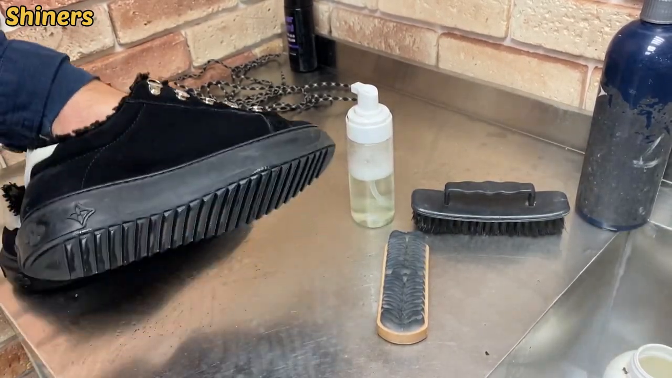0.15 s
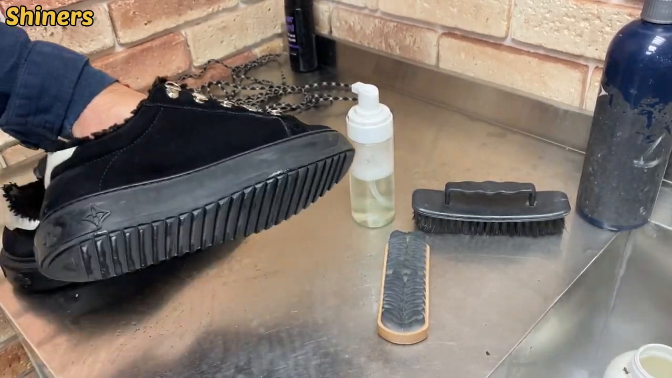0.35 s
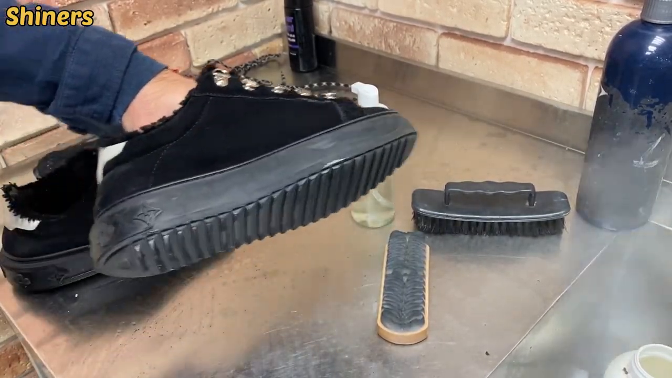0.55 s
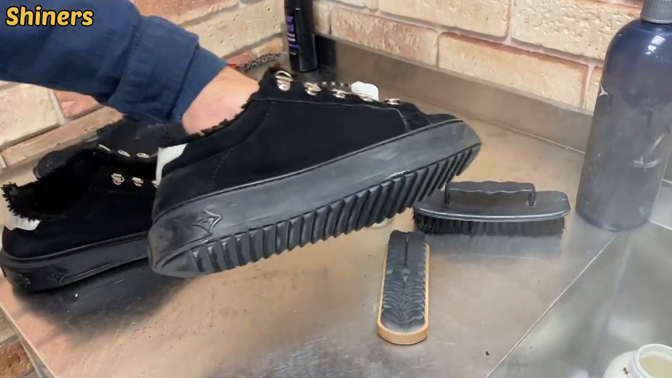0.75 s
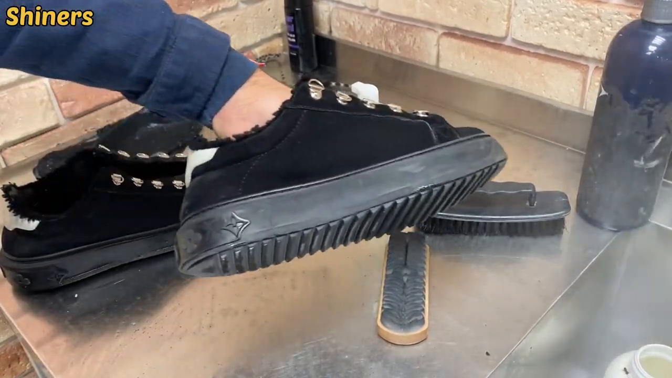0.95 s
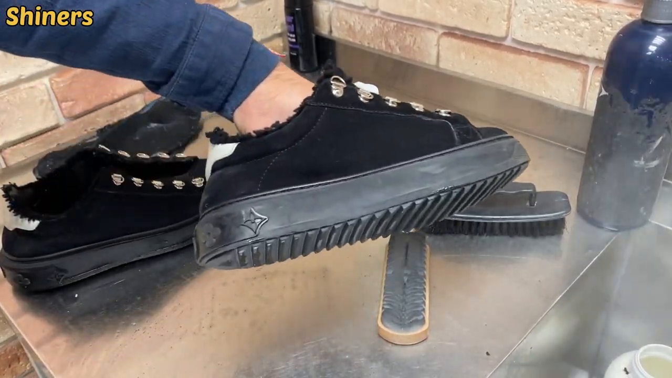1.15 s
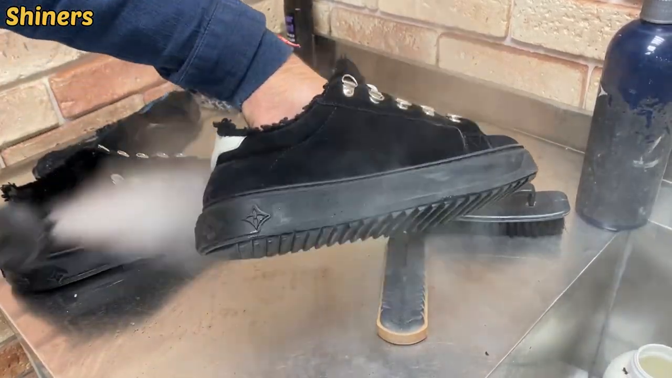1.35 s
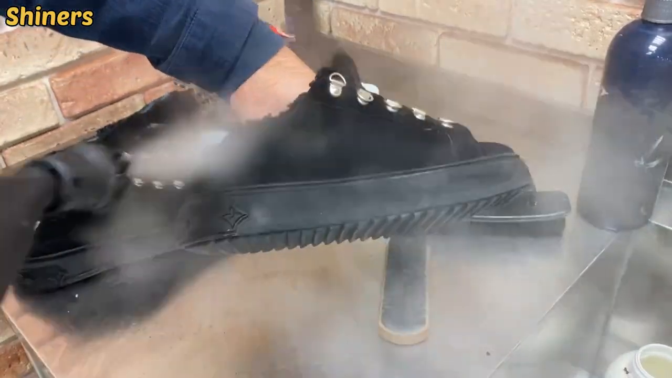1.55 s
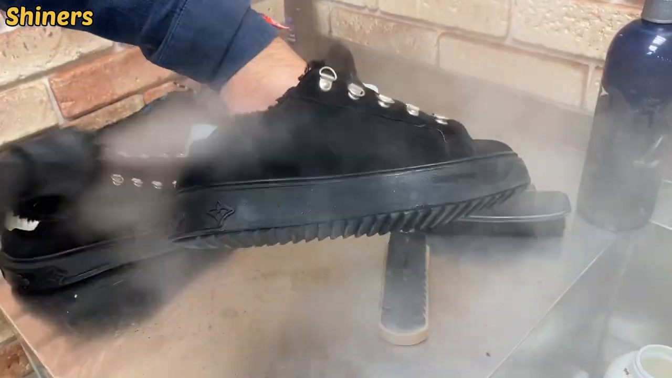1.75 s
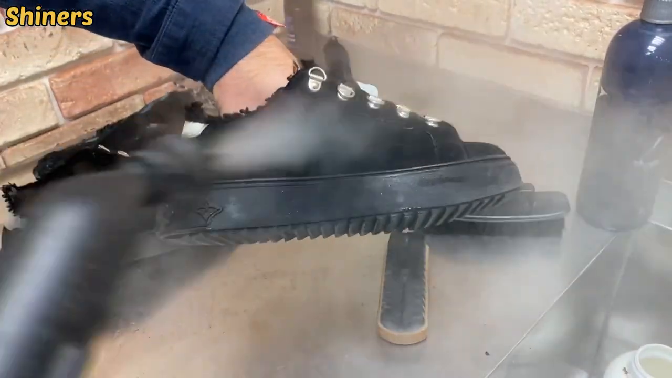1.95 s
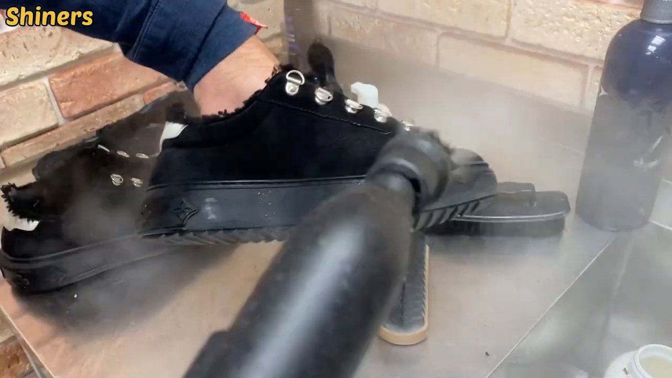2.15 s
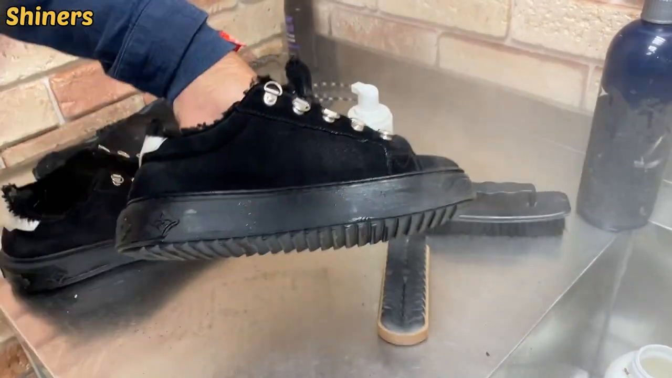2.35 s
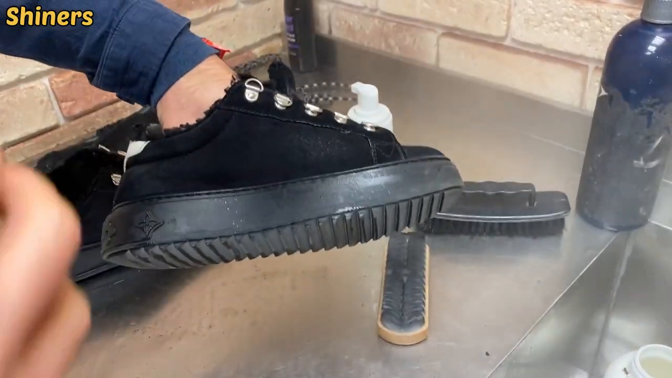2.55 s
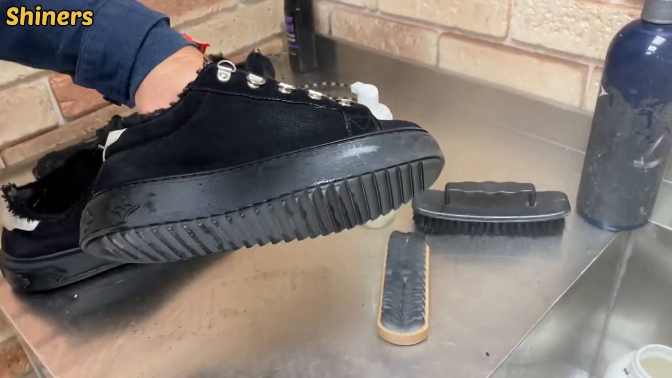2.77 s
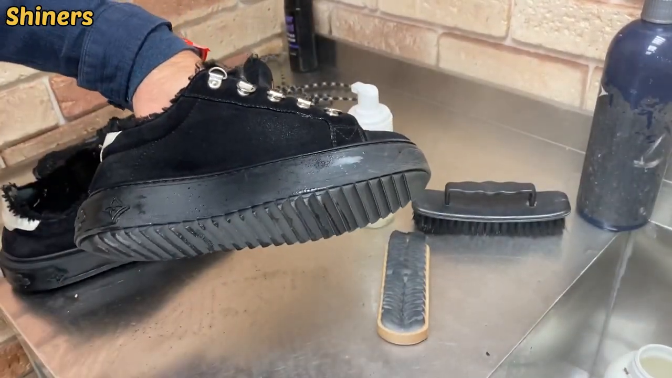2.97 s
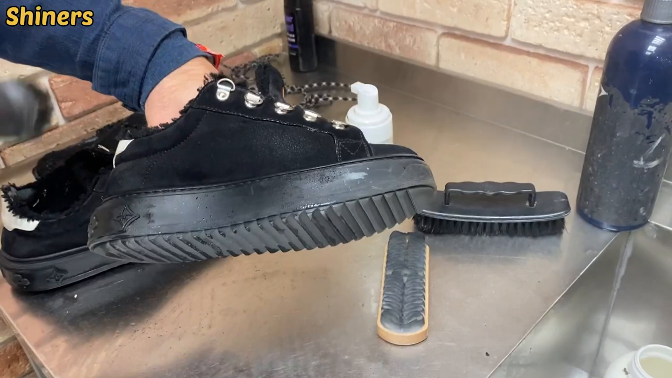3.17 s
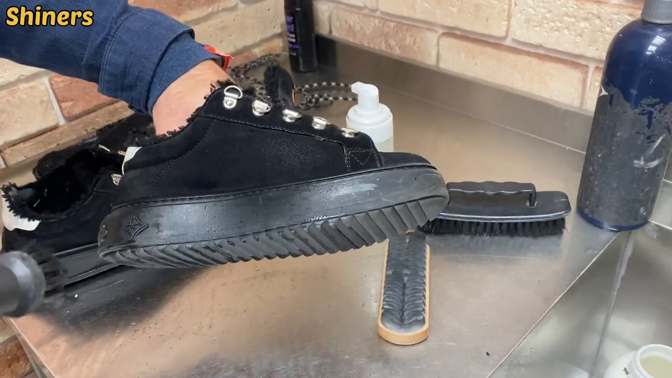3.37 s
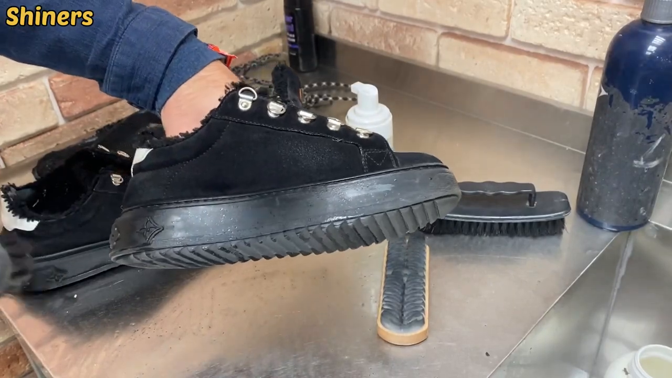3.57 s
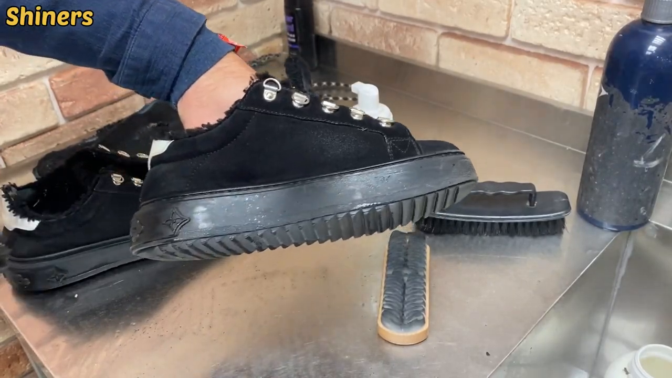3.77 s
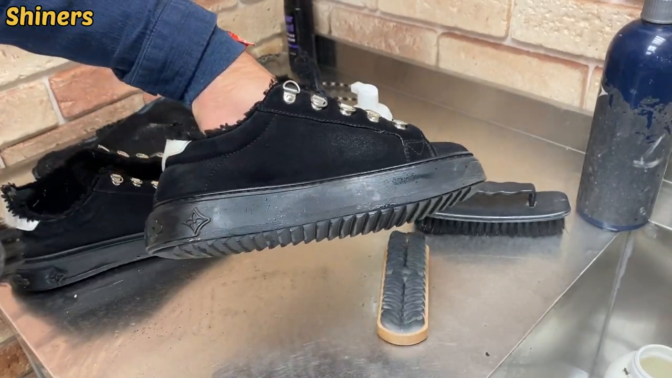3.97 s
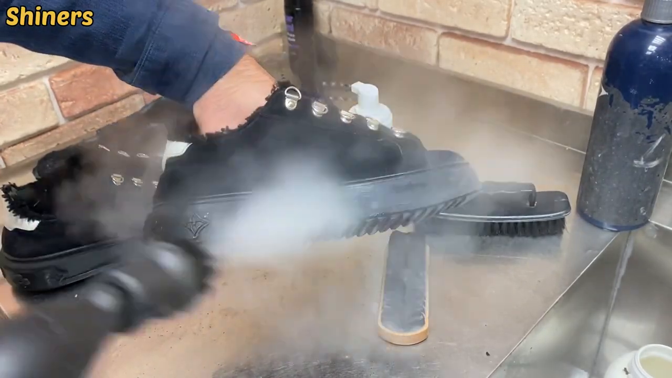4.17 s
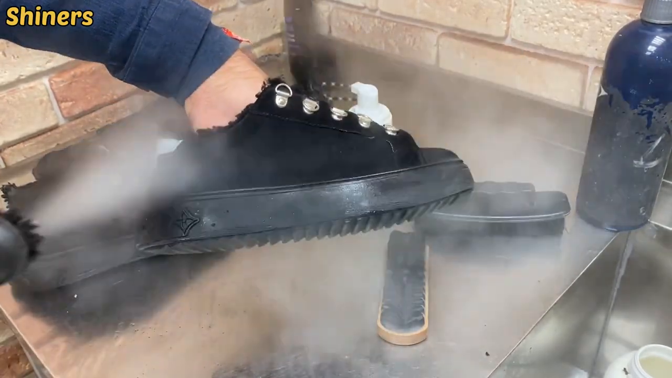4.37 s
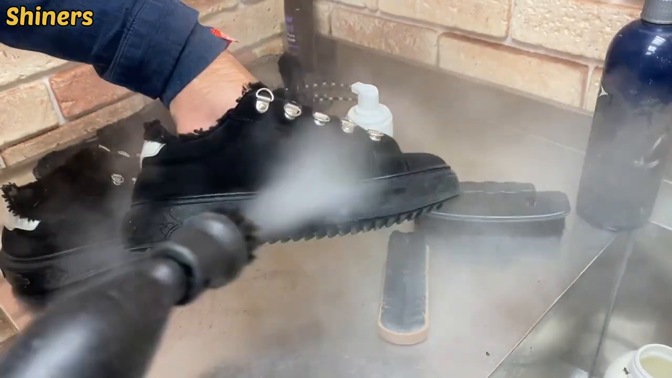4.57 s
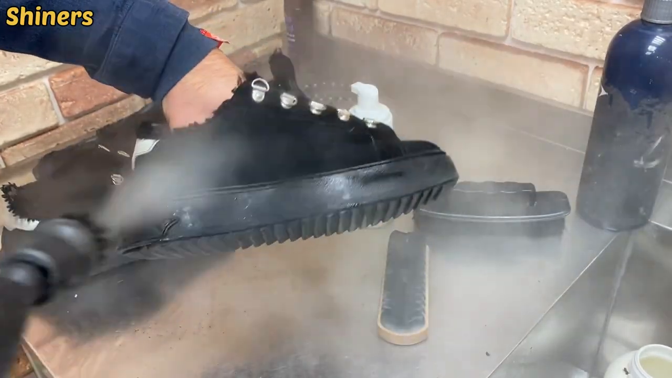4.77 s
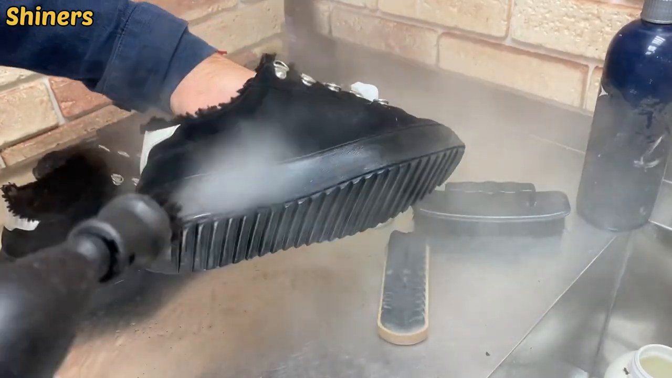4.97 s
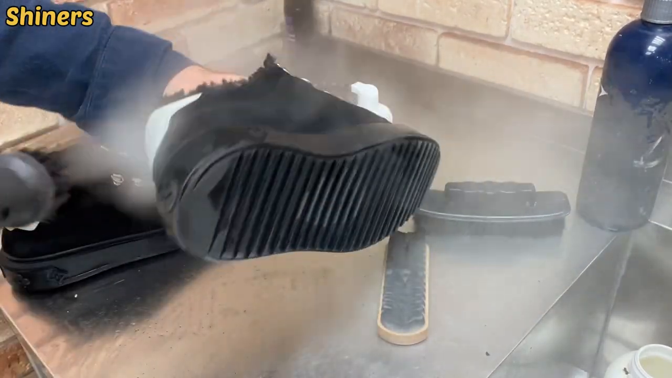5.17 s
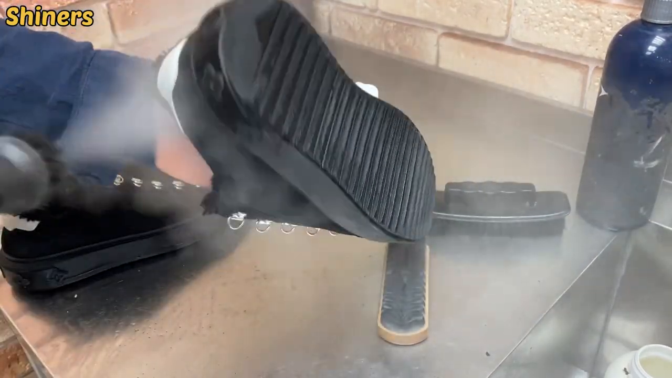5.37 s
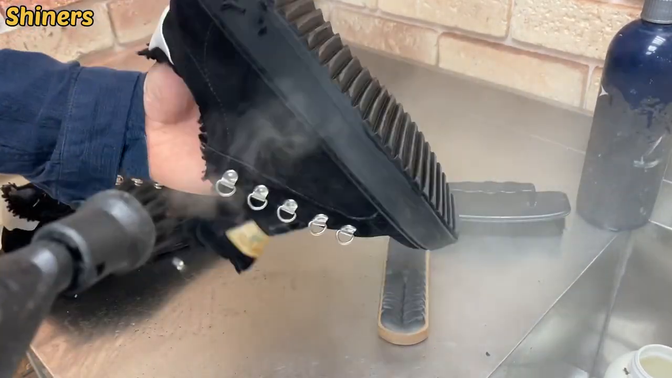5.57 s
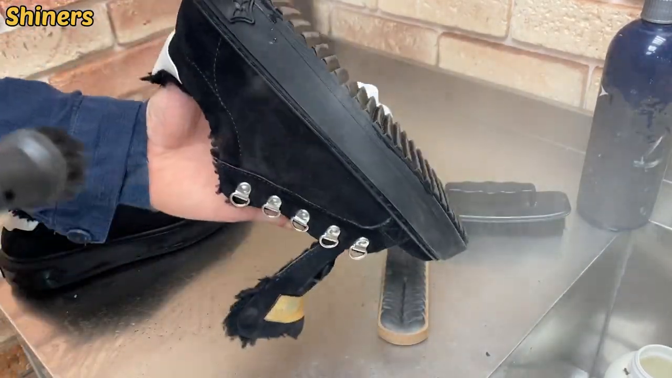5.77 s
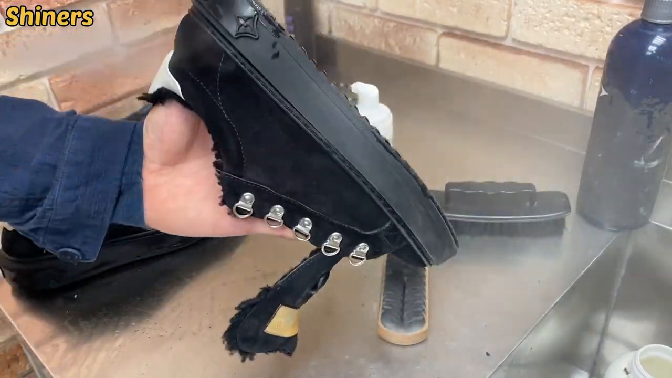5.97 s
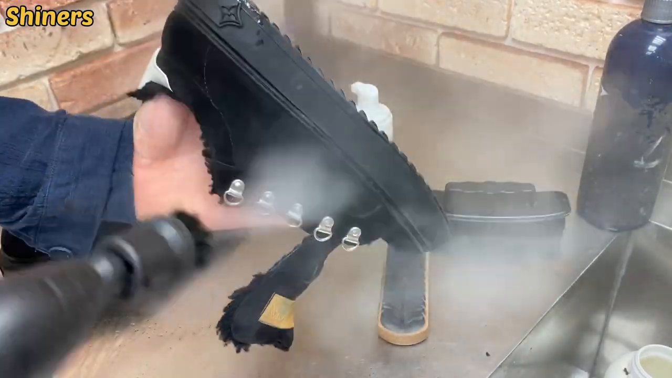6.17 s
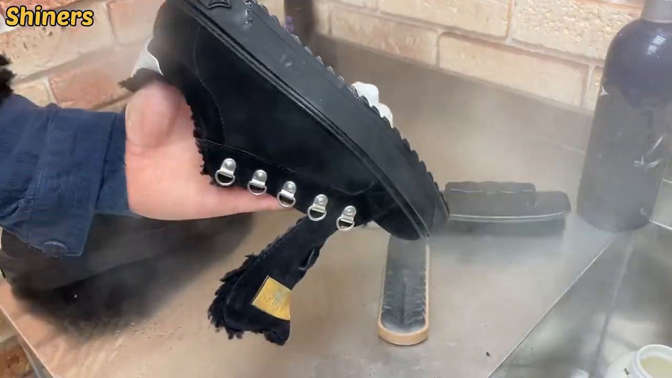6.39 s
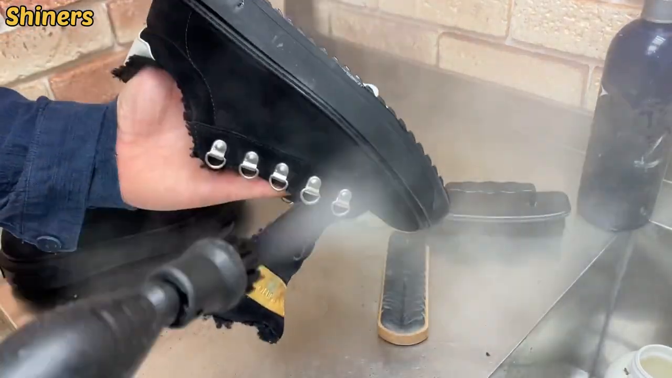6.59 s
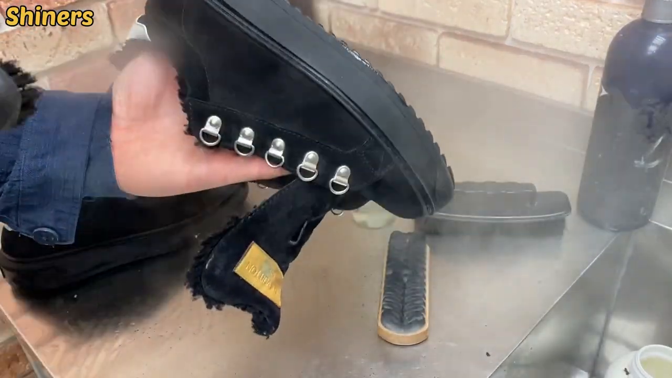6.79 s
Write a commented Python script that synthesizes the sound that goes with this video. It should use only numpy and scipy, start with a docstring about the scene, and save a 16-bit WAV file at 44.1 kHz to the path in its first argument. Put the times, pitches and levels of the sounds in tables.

```python
"""A low room hum, a steel counter's hum and a dying hiss come first, then two test puffs of a handheld steamer.
Three long, wet bursts on a suede shoe follow; between them wand and hose knock, drag and squeak.
Steam is filtered noise in three bands, with valve, pressure and surge gains, sputters and droplets.
Handling is noise in resonances, the counter decaying sines; a small brick room rings after each burst."""
import sys
import numpy as np
from scipy import signal
from scipy.fft import rfft, irfft
from scipy.io import wavfile
from scipy.ndimage import uniform_filter1d

SR = 44100
rng = np.random.default_rng(int(sys.argv[2]) if len(sys.argv) > 2 else 0)


def dump(signal):
    """Clip the signal to [-1, 1] and save it as 16-bit WAV at the path in sys.argv[1]."""
    limited = np.clip(np.atleast_2d(signal).T, -1, 1)
    pcm = np.round(limited * 32767).astype(np.int16)
    wavfile.write(sys.argv[1], SR, pcm)


N = 301203
TIME, FREQ = np.arange(N) / SR, np.fft.rfftfreq(N, 1 / SR)


def amp(db):
    """Decibels to gain."""
    return 10 ** (np.asarray(db) / 20)


def unit(x):
    """Scales to rms 1."""
    return x / np.sqrt(np.mean(x ** 2) + 1e-20)


def read(points, hz, axis=1):
    """One column of a table, interpolated over log frequency."""
    table = np.transpose(points)
    return np.interp(np.log(hz + 1), np.log(table[0] + 1), table[axis])


def colour(x, gain):
    """Filters by a gain over FREQ."""
    return irfft(rfft(x) * gain, N)


def noise(gain):
    """Two unrelated noises of that colour: row 0 the common sound, row 1 the diffuse one."""
    return unit(colour(rng.standard_normal((2, N)), gain))


def below(hz, order=4):
    """Low-pass gain."""
    return 1 / np.sqrt(1 + (FREQ / hz) ** (2 * order))


def thirds(low_hz, high_hz):
    """Treble, middle and bass gains whose powers sum to one."""
    low, high = below(low_hz), below(high_hz)
    treble = np.sqrt(1 - high ** 2)
    middle = high * np.sqrt(1 - low ** 2)
    return treble, middle, high * low


def peaks(modes):
    """Gain of a set of resonances, summed in power."""
    power = 0
    for hz, width_hz, db in modes:
        power = power + amp(db) ** 2 / (1 + (2 * (FREQ - hz) / width_hz) ** 2)
    return np.sqrt(power)


def wander(rate_hz):
    """Random drift of rms 1, up to about that rate."""
    return unit(colour(rng.standard_normal(N), below(rate_hz, order=2)))


def blow(start_s, rise_s, t60_s):
    """Envelope that swells at start_s and dies away."""
    age_s = np.maximum(TIME - start_s, 0)
    return (1 - np.exp(-age_s / rise_s)) * np.exp(-np.log(1000) * age_s / t60_s)


def gate(start_s, end_s, attack_s, release_s, snap=0.58):
    """Gain that ramps up, holds, then eases off and snaps shut."""
    opening = np.clip((TIME - start_s) / attack_s, 0, 1)
    closing = np.clip((end_s - TIME) / release_s, 0, 1) ** snap
    return opening * closing


# room's lowest resonances: pitch_hz, width_hz, level_db
HUM_MODES = [(71, 4.6, 2), (40, 40, -14.5), (130, 22, -7)]


def boom():
    """Noise in the room's lowest resonances, rms 1."""
    return noise(peaks(HUM_MODES) * below(hz=135, order=5))


# faint room noise spectrum: pitch_hz, density_db (per Hz)
FLOOR = [(20, -8), (100, 4), (300, -10.5), (700, -16.5), (1500, -27), (4000, -29), (7000, -35.5),
         (15000, -39)]
# steady hum level; gains by which puffs, bursts and hose stir it; linger time constant
HUM_DB, HUM_PUFF_DB, HUM_JET_DB, HUM_HOSE_DB, HUM_LINGER_S = -54, -27, -32.5, 1.5, 0.11


def background(puffs, bursts, dragging):
    """Low hum whose power swells with steam and hose and lingers, over faint room noise."""
    stir = 0
    for db, source in [(HUM_PUFF_DB, puffs), (HUM_JET_DB, bursts), (HUM_HOSE_DB, dragging)]:
        stir = stir + (amp(db) * source[0]) ** 2
    keep = np.exp(-1 / (HUM_LINGER_S * SR))
    stirred_power = signal.lfilter([1 - keep], [1, -keep], stir)
    level = np.sqrt(amp(HUM_DB) ** 2 + stirred_power)
    return level * boom() + amp(-64.5) * noise(amp(read(FLOOR, FREQ)))


# steam spectrum, aimed at the counter: pitch_hz, density_db (per Hz)
PUFF_SPECTRUM = [(40, -35.5), (110, -15), (250, 3), (480, -6.5), (720, -9.5), (900, -7.5), (1300, -8.5),
                 (2400, -9.5), (3400, -12), (5200, -10), (7200, -4), (9500, -5.5), (12000, -12.5),
                 (15500, -17.5)]


def dying_hiss():
    """The room still rings and booms with steam let off a moment before."""
    hiss = noise(amp(read(PUFF_SPECTRUM, FREQ)) * below(hz=9000, order=2))
    hiss = amp(-45.0) * blow(0, rise_s=0.0007, t60_s=0.71) * hiss
    return hiss + amp(-42) * blow(0, rise_s=.002, t60_s=1.8) * boom()


# hums of the steel counter: start_s, pitch_hz, level_db, t60_s
COUNTER = [(0.0, 217, -49, 0.77), (0.221, 211.5, -42, 2.0), (0.228, 122, -36.5, 1.3),
           (0.749, 128, -36.5, 1.7), (1.24, 124.8, -32, 1.2)]


def counter():
    """Low modes of the steel sheet: decaying sines, in the common sound only."""
    hum = np.zeros(N)
    for start_s, hz, db, t60_s in COUNTER:
        hum += amp(db) * blow(start_s, .01, t60_s) * np.sin(2 * np.pi * hz * (TIME - start_s))
    return hum * np.array([[1], [0]])


# slugs of wet steam that surge or choke the jet: centre_s, buffet_change_db, hiss_and_splash_change_db
SURGES = [(0.36, 4, 0), (0.765, 7, 2), (1.385, 2.5, 1.5), (1.445, 1.5, 4.5), (1.51, 3.5, 1.5),
          (1.57, 0.5, -2), (1.71, 4.5, 3), (1.811, -3, -2), (1.88, 1, 2), (1.95, 3, 2), (2.005, -6, -2),
          (2.08, 0, 1), (4.115, -10, -1.5), (4.143, 10, 0), (4.219, 8, 1), (4.39, 12, 1), (4.55, 9.5, 2.5),
          (4.651, 13, 2), (4.735, 8.5, 2), (4.8, -14.5, -1), (5.0, 8, 1.5), (5.13, 11.5, 0.5),
          (5.405, 12, 2), (5.98, -13.5, -1.5), (6.005, 6, 0.5), (6.199, 9, 1.5), (6.435, 11.5, 2),
          (6.57, 3.5, 1.5), (6.66, 8, 3), (6.82, 10.5, 0.5)]
SURGE_S = .022  # half length, to 1/e of the dB change


def surge(axis):
    """Summed dB change from the slugs: column 1 for buffeting, 2 for hiss and splash."""
    return sum(row[axis] * np.exp(-((TIME - row[0]) / SURGE_S) ** 2) for row in SURGES)


SAG_S = 0.6  # time constant of the boiler pressure sag


def flow(pulls, splash_power=0.42, buffet_power=.9, buffet_sag=1.25):
    """Gains of hiss, splash and buffeting: valve opens, pressure sags, slugs surge, valve shuts."""
    hiss, splash, buffet = np.zeros((3, N))
    for start_s, end_s, opening_s, closing_s, hiss_db, splash_db, buffet_db, sag_db in pulls:
        valve = gate(start_s, end_s, opening_s, closing_s)
        sag = 1 - np.exp(-np.maximum(TIME - start_s, 0) / SAG_S)
        pressure = amp(-sag_db * sag)
        hiss += amp(hiss_db) * valve * pressure
        splash += amp(splash_db) * valve ** splash_power * pressure
        buffet += amp(buffet_db) * valve ** buffet_power * pressure ** buffet_sag
    lift = amp(surge(axis=2))
    return hiss * lift, splash * lift, buffet * amp(surge(axis=1))


def reflect(x, echo_db, longest_s, sway_s, count=5):
    """Nearby surfaces echo the jet; their paths change as the hand moves."""
    out = x.copy()
    for k in range(count):
        path_s = longest_s * (k + rng.uniform(.3, 1)) / count
        sway = np.sin(2 * np.pi * (rng.uniform(.2, .6) * TIME + rng.random()))
        delay_s = path_s + sway_s * sway
        at = np.clip(np.round((TIME - delay_s) * SR).astype(int), 0, N - 1)
        out += amp(echo_db) * x[:, at]
    return unit(out)


def gurgle(x, patchy_db, size=512):
    """Wet steam is uneven: patches a few hundred hertz wide swell and fade."""
    z = signal.stft(x, nperseg=size)[2]
    patches = uniform_filter1d(rng.standard_normal(z.shape[1:]), size=4, axis=0)
    patches = uniform_filter1d(patches, size=7, axis=1)
    uneven = signal.istft(z * amp(patchy_db * unit(patches)), nperseg=size)[1]
    return unit(uneven[:, :N])


def steam(gains, shape, hiss_db, splash_db, buffet_db, echo_db):
    """Turbulent jet: smooth hiss, fluttering splash and lumpy buffeting share the same eddies."""
    jet = reflect(noise(shape), echo_db, longest_s=.006, sway_s=.00016)
    hiss, splash, buffet = (unit(colour(jet, band)) for band in thirds(low_hz=666, high_hz=4514))
    eddies, spray = wander(rate_hz=26), wander(rate_hz=960)
    hiss = gurgle(hiss, patchy_db=2.5) * amp(hiss_db + 0.73 * eddies + .5 * spray)
    splash = gurgle(splash, patchy_db=2.5) * amp(splash_db + 0.36 * eddies + .9 * spray)
    buffet = buffet * amp(buffet_db + 1.6 * eddies + 0.88 * wander(rate_hz=34))
    return sum(layer * gain for layer, gain in zip((hiss, splash, buffet), gains))


# trigger pulls at the counter, dB before trims:
# start_s, end_s, opening_s, closing_s, hiss_db, splash_db, buffet_db, sag_db
PUFFS = [(0.201, 0.398, 0.022, 0.041, -10.5, -21, -27, 21),
         (0.726, 0.93, .034, .035, -13.5, -24.5, -32.5, 7)]
# nozzle-to-counter resonances, one list per puff: pitch_hz, width_hz, level_db (before trim)
CAVITY = [
    [(1110, 44, -7.5), (2395, 86, -9), (4190, 86, -5), (5000, 240, -8.5), (5493, 74, -6), (6320, 44, 0),
     (7860, 103, -0.5), (7770, 43, -5.5), (11000, 40, -6.5), (11600, 230, -17)],
    [(2330, 190, -6), (5130, 120, -6), (5770, 44, -11.5), (6760, 120, -11.5), (7150, 70, 0.5),
     (11100, 36, -7.5), (11100, 140, -5)],
]


def test_puffs():
    """Short puffs at the counter, coloured by the gap between nozzle and steel."""
    smooth = amp(read(PUFF_SPECTRUM, FREQ))
    out = 0
    for pull, modes in zip(PUFFS, CAVITY):
        shape = np.hypot(smooth, amp(-0.5) * peaks(modes))
        out = out + steam(flow([pull]), shape, hiss_db=1.5, splash_db=0.34, buffet_db=-1.0, echo_db=-13.5)
    return out


# slugs of condensed water: start_s, level_db (before trim), centre_hz
SPUTTERS = [(0.218, -8, 904), (0.243, -14.5, 264), (0.262, -15.5, 459.6), (0.747, -12, 891),
            (1.44, -16, 353), (4.139, -22.5, 280), (5.119, -25.5, 269), (6.001, -20, 283),
            (6.424, -27, 258)]


def sputters():
    """Water slugs burst from the nozzle as short, rough pops of noise."""
    band = below(hz=1900, order=2) * np.sqrt(1 - below(hz=191) ** 2)
    out = np.zeros((2, N))
    for start_s, db, hz in SPUTTERS:
        pop = noise(band * (amp(-9.5) + peaks([(hz, 250, 0)])))
        out += amp(db - 4.5) * blow(start_s, rise_s=0.00069, t60_s=0.0863) * pop
    return out


def droplets(splash):
    """Drops carried by the jet crackle on the suede, more loudly in a strong jet."""
    size_db = 1.8 * np.minimum(rng.exponential(1, (2, N)), 4)
    size = amp(size_db) * rng.choice([-1., 1.], (2, N))
    hits = size * (rng.random((2, N)) < 500 / SR)  # 500 drops per second
    crackle = unit(colour(hits, peaks([(1600, 1400, 0.0027), (3400, 2000, 0)])))
    return amp(-5.5) * crackle * splash


# trigger pulls at the shoe, dB before trims:
# start_s, end_s, opening_s, closing_s, hiss_db, splash_db, buffet_db, sag_db
BURSTS = [(1.238, 2.158, 0.028, .08, -14.5, -25, -32, 5.5),
          (4.09, 5.488, 0.061, .04, -13.5, -25, -38, 10.4), (5.956, 6.9, .05, .04, -17, -29.5, -42, 6.1)]
# steam spectrum, aimed at the shoe: pitch_hz, density_db (per Hz)
JET_SPECTRUM = [(40, -35.5), (110, -15), (190, -8), (245, -4), (310, -8.5), (420, -18), (540, -16.5),
                (730, -13.5), (1200, -13), (1650, -10), (2000, -12), (3600, -11), (6000, -6.5), (7100, 1.3),
                (8400, 2), (9800, 0), (12500, -2.5), (15500, -8)]


def shoe_bursts():
    """Long, wet bursts on the suede: jet plus droplets."""
    gains = flow(BURSTS)
    shape = amp(read(JET_SPECTRUM, FREQ))
    jet = steam(gains, shape, hiss_db=3.0, splash_db=-0.5, buffet_db=1.0, echo_db=-12.0)
    return jet + droplets(splash=gains[1])


# knocks of wand and hose, dB before trims: start_s, level_db, centre_hz, tick_db (added to level_db)
KNOCKS = [(1.238, -26.5, 300.3, -18.5), (2.252, -39, 412, -16), (2.308, -46, 202, -20),
          (2.377, -44.5, 299, -7), (2.661, -29.5, 328, -17.5), (2.781, -29.5, 422, -26),
          (2.93, -33, 315, -34), (2.968, -34.5, 560, -34), (3.013, -37, 324, -25), (3.049, -27.5, 256, -33),
          (3.088, -38, 300, -35), (3.174, -42, 315, -35), (3.269, -42, 319, -32), (3.368, -47.5, 320, -31),
          (3.526, -48, 630, -28), (3.697, -42.5, 317, -39.5), (3.823, -40.5, 320, -47.5),
          (3.873, -45.5, 480, -36.5), (3.911, -41, 315, -33.5), (3.989, -39.5, 315, -49.5),
          (4.034, -34.5, 322, -48), (5.482, -40, 301, -25), (5.736, -52.5, 550, -9),
          (5.911, -48, 292, -24.5)]
# wand modes: pitch_hz, width_hz, level_db
WAND = [(283, 60, -4), (398, 24, -2), (583, 50, -5), (679, 50, -13), (880, 60, -15), (1050, 20, -5.5)]


def knocks():
    """Each knock shakes the wand's modes, most strongly around its own centre, with a faint tick."""
    body = peaks(WAND) * below(hz=1110, order=6) * np.sqrt(1 - below(hz=220) ** 2)
    tick = noise(below(hz=4520, order=2))
    out = np.zeros((2, N))
    for start_s, db, hz, tick_db in KNOCKS:
        ring = noise(body * (amp(-11.0) + peaks([(hz, 160, 0)])))
        out += amp(db - 4.0) * ring * blow(start_s, rise_s=0.0018, t60_s=0.14)
        out += amp(db + tick_db - 3.5) * tick * blow(start_s, rise_s=.0005, t60_s=0.049)
    return out


# hose pulls, dB before trims: start_s, length_s, rumble_db, rub_db, rustle_db, fade_db_per_s
DRAGS = [(2.192, 0.22, -47.5, -55, -76, 27.5), (2.483, 0.12, -73, -68, -71, 10),
         (2.666, 0.47, -46.5, -57.5, -73, 1), (3.142, 0.17, -52.5, -63, -75.5, 9),
         (3.307, 0.28, -65.5, -88, -73.5, 19.5)]
# dragged hose spectrum: pitch_hz, density_db (per Hz)
DRAG_SPECTRUM = [(59, -32), (100, 1), (318, -11), (471, -16), (556, -5), (713, -24.5), (1060, -26),
                 (1220, -32), (14000, -44)]
DRAG_ATTACK_S, DRAG_RELEASE_S = 0.01976, 0.031


def hose():
    """The dragged hose rumbles unevenly, rubs and rustles; each pull fades as the hose slows."""
    shape = amp(read(DRAG_SPECTRUM, FREQ))
    rustle, rub, rumble = (noise(shape * band) for band in thirds(low_hz=780, high_hz=1430))
    slips = amp(3.2 * wander(rate_hz=32))
    out = np.zeros((2, N))
    for start_s, length_s, rumble_db, rub_db, rustle_db, fade_db_per_s in DRAGS:
        pull = gate(start_s, start_s + length_s, DRAG_ATTACK_S, DRAG_RELEASE_S)
        pull = pull * amp(-fade_db_per_s * np.maximum(TIME - start_s, 0))
        uneven = slips * (amp(rumble_db - 2.5) * rumble + amp(rub_db) * rub)
        out += pull * (uneven + amp(rustle_db + 2.5) * rustle)
    return out


# hose catches and rubs: start_s, length_s, level_db, squeak_hz, rasp_db (relative to squeak)
RUBS = [(2.763, 0.039, -36.5, 429, -27), (2.803, 0.069, -41.5, 926, -7.5),
        (2.851, 0.015, -41.5, 1000, -7.5), (3.184, 0.042, -47, 670, -23)]


def rubs():
    """Stick and slip: a fuzzy squeak of narrow noise with a dry rasp."""
    rasp = noise(below(hz=3800, order=2) * peaks([(1450, 350, 0.5), (2200, 500, -5), (3500, 2100, -11)]))
    out = np.zeros((2, N))
    for start_s, length_s, db, hz, rasp_db in RUBS:
        stroke = np.sqrt(np.abs(np.sin(np.pi * np.clip((TIME - start_s) / length_s, 0, 1))))
        squeak = noise(peaks([(hz, 130, 0)]) ** 2)
        out += amp(db) * stroke * (squeak + amp(rasp_db) * rasp)
    return out


# room decay: pitch_hz, t60_s
ROOM = [(120, 0.94), (400, 0.66), (1000, 0.53), (2800, 0.43), (7300, 0.38), (15000, 0.28)]


def room(x, count=3):
    """Sparse taps, each band dying at its own speed; the moving source passes between sets of paths."""
    out = np.zeros((2, N))
    for k in range(count):
        present = rng.random((2, SR)) < 3000 / SR  # 3000 taps per second
        taps = rng.choice([-1., 1.], (2, SR)) * present * (TIME[:SR] > .005)
        hz, t, z = signal.stft(taps, SR, nperseg=256)
        decay = amp(-60 * t / read(ROOM, hz)[:, None])
        tail = signal.istft(z * decay, SR, nperseg=256)[1]
        share = np.cos(np.pi * (.6 * TIME + k / count)) * np.sqrt(2 / count)
        out += signal.fftconvolve(x * share, tail / np.linalg.norm(tail[0]), axes=1)[:, :N]
    return out


# two microphone ports: pitch_hz, likeness (0-1), left_minus_right_db
PORTS = [(60, 1, -0.5), (250, 0.82, 0.6), (500, 0.3, 2.5), (1100, 0.15, 2.5), (2050, 0.1, 2.5),
         (3000, 0.5, 4.5), (3340, 1, -0.5), (5160, 0.4, 3.5), (7300, 1, 0.5), (11000, 1, -0.5),
         (15100, 0.8, 0.5)]
LAG_FROM_HZ, LAG_TURN_HZ = 6850, 4380  # left lags above the first, one turn of phase per the second


def ports(x):
    """Common and diffuse sound reach two ports; in the treble the left one lags."""
    common, diffuse = rfft(x)
    same = np.clip(read(PORTS, FREQ), -1, 1)
    tilt = amp(read(PORTS, FREQ, axis=2) / 2)
    mid, side = common * np.sqrt((1 + same) / 2), diffuse * np.sqrt((1 - same) / 2)
    lag = np.exp(-2j * np.pi * np.maximum(FREQ - LAG_FROM_HZ, 0) / LAG_TURN_HZ)
    left, right = (mid + side) * lag * tilt, (mid - side) / tilt
    return irfft(np.array([left, right]), N)


def scene():
    """Steam and handling in the room; the handling is close, so less of it is diffuse."""
    puffs, bursts, dragging = test_puffs(), shoe_bursts(), hose()
    vapour = puffs + bursts + sputters()
    handling = (dragging + rubs() + knocks()) * amp([[0], [-3.0]])
    echo = room(amp(-14.5) * vapour + amp(-7.0) * handling)
    bed = dying_hiss() + counter() + background(puffs, bursts, dragging)
    return ports(vapour + handling + echo + bed)


EDGE_HZ = 15800


def record(dry):
    """A 6 ms soft start, clipping of any peak above full scale, then the band limit."""
    clipped = np.clip(dry * np.minimum(TIME / .006, 1) ** 2, -1, 1)
    lowpass = signal.firwin(511, EDGE_HZ, window=("kaiser", 9), fs=SR)
    return signal.oaconvolve(clipped, lowpass[None], "same")


dry = scene()
out = record(dry)
dump(out)
```